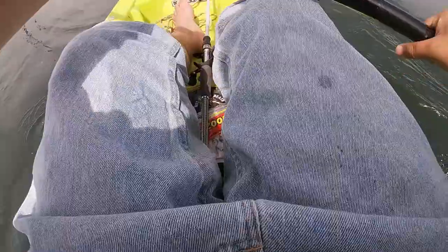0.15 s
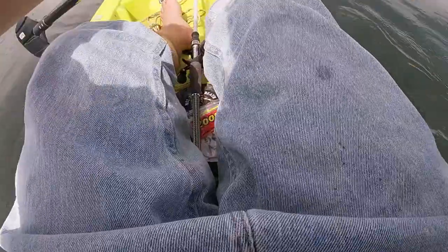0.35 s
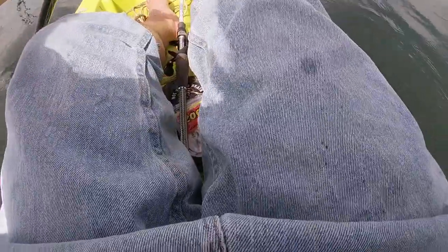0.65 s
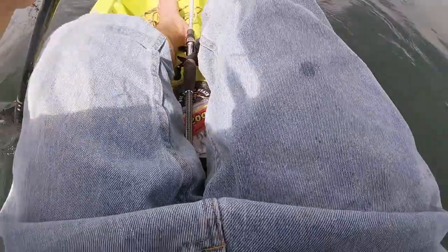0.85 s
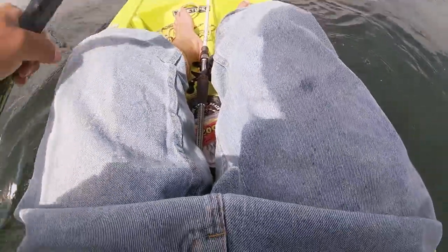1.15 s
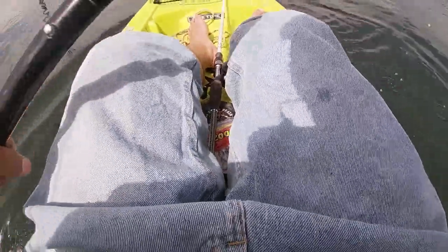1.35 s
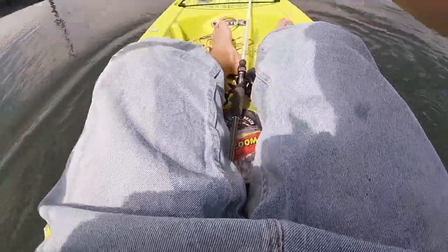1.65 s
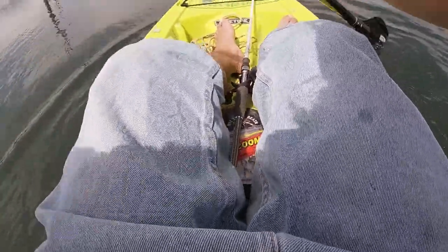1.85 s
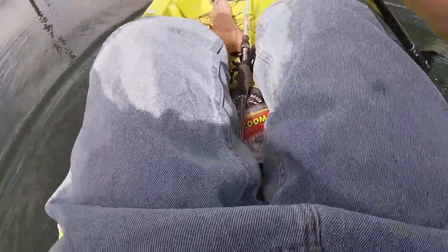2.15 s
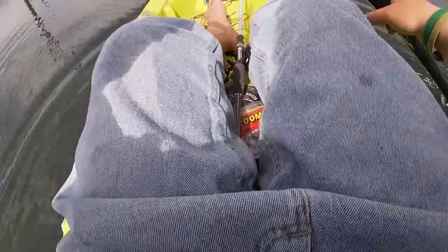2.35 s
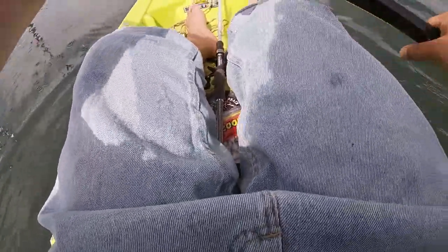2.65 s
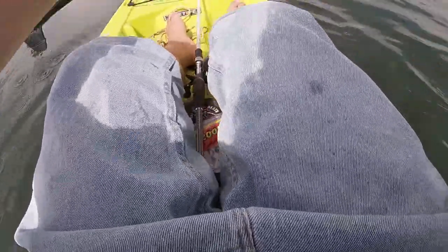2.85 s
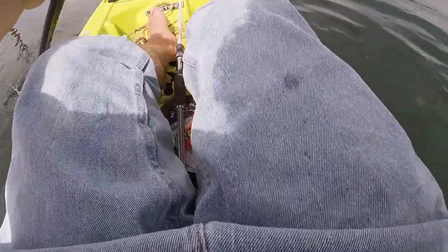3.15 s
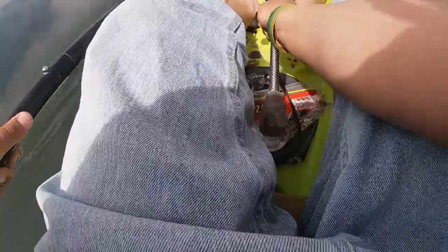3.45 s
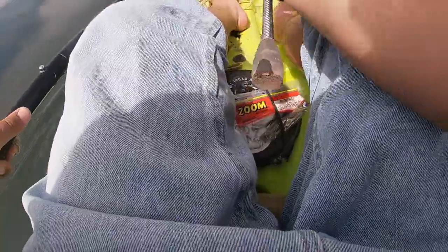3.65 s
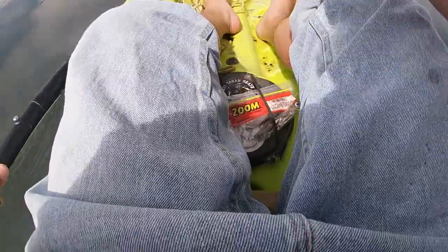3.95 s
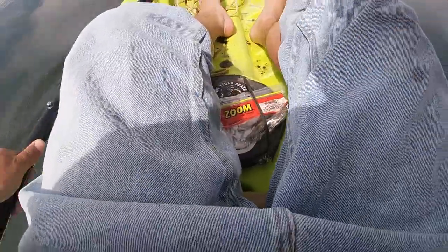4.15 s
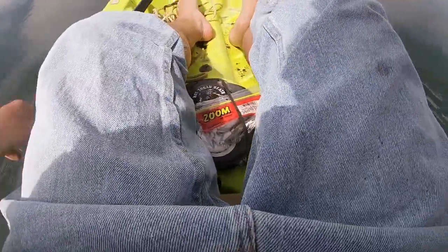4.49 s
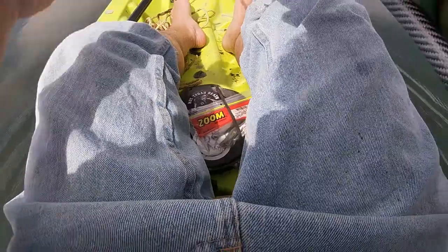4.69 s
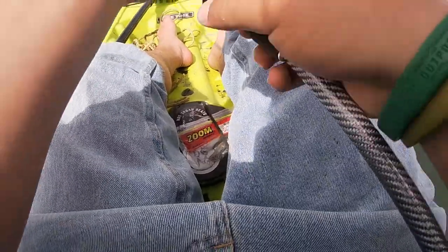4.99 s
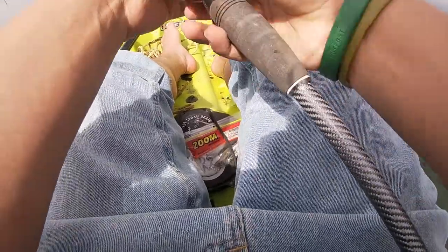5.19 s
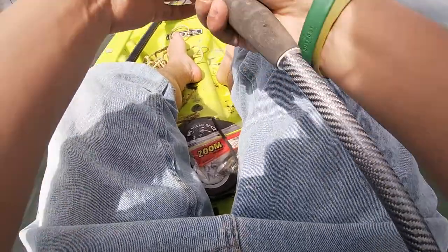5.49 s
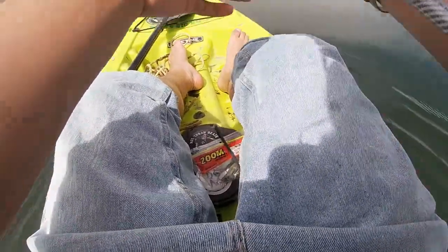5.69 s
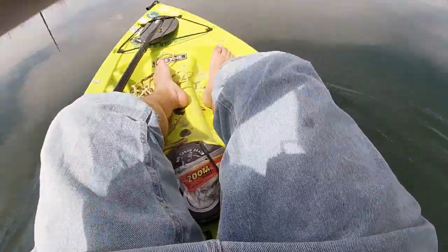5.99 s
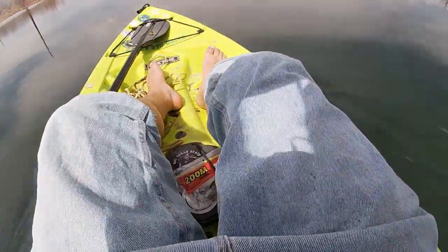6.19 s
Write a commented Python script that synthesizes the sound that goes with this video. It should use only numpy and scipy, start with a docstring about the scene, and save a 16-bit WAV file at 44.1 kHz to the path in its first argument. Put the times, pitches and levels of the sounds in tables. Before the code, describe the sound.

Low wind rumble opens alone; at about 0.13 s a bright, dense splash bursts out, full of fizz, spatter and ringing bubbles against a hollow plastic hull. It eases after 0.8 s into looser gurgles and plops, with lumpy wind thumps growing to the heaviest buffet near 1.8 s. The water thins around 2-2.5 s, bubbles singly, then surges duller and deeper from 2.65 to 3.3 s with a few hard ticks. By 3.4 s the sliding water stops and the kayak floats: soft lapping, scuffing cloth and gear, and hollow knocks, the firmest double knock at 4.0 s. Smaller taps and rubs follow. Thin high bird whistles and husky chirps appear around 4.6-5.4 s. A crisp fitting snap lands at 5.53 s, then a rapid falling-note trill runs 5.65-6.0 s over faint rustle, ending near 6.3 s with a light tick. Close outdoor microphone, muted treble.

```python
"""A plastic kayak slides off into a pond: water splashes, fizzes and gurgles along the hollow hull.
Once it floats, ripples lap, gear knocks and rubs on the hull, a fitting snaps, and small birds whistle
and trill on the shore; wind buffets the microphone. Water is made of ringing bubbles and shaped noise, solid
parts of clicks that set damped tones ringing, birds of gliding tones, chirps of noise. It sounds dull above 8 kHz."""
import sys
import numpy as np
from scipy import signal
from scipy.fft import rfft, irfft, next_fast_len
from scipy.io import wavfile

SR = 44100
rng = np.random.default_rng(int(sys.argv[2]) if len(sys.argv) > 2 else 0)


def output_pcm(signal):
    """Save a mono or channel-first signal as 16-bit PCM at the path in sys.argv[1].

    Samples are clipped to [-1, 1] before scaling.
    """
    pcm = np.clip(np.atleast_2d(signal).T, -1, 1) * 32767
    wavfile.write(sys.argv[1], SR, np.round(pcm).astype(np.int16))


N = 279133

# Splashing over time: t/s, level at 0.6-2 kHz/dB, 2.5-6 kHz against that/dB, above 6.4 kHz against it/dB
SPLASH_CURVE = [(0.0, -63.5, 13, -8), (0.126, -64.5, 15, -6.5), (0.138, -31.5, -7, -12),
                (0.23, -33.5, -9.5, -11.5), (0.3, -31.5, -11, -7), (0.325, -31, -10, -4),
                (0.37, -37, -2, -13), (0.41, -31, -11, -12), (0.5, -34, -4, -8.5), (0.6, -38.5, 6.5, -11),
                (0.68, -39, -0.5, -13.5), (0.735, -39, -3.5, -7.5), (0.76, -35, -3, -13),
                (0.8, -39.5, -1.5, -9.5), (0.88, -46, -5, -9), (0.95, -40.5, 0, -7), (1.06, -44, -11, -10),
                (1.17, -45.5, 4.5, -11.5), (1.21, -45.5, -5.5, -11), (1.32, -42, -4, -17),
                (1.38, -43.5, -1, -10.5), (1.45, -40.5, 0.5, -17.5), (1.63, -41, -5, -13.5),
                (1.78, -39.5, -12, -9.5), (1.87, -46.5, 4.5, -26), (1.93, -40.5, -19, -18),
                (1.98, -50, 1, -17), (2.08, -49, -3, -26), (2.13, -42.5, -11.5, -34),
                (2.22, -46.5, -16, -16), (2.28, -51.5, -7, -31), (2.37, -43, -19.5, -28),
                (2.42, -46, -27, -34), (2.499, -46, -15.5, -38), (2.58, -49.5, -24, -27),
                (2.62, -46.5, -13, -32), (2.66, -38.5, -23, -38), (2.69, -40.5, -8.5, -24),
                (2.74, -40, -13, -30), (2.77, -42, -7, -27), (2.8, -42.5, -5, -27), (2.84, -34.5, -13, -31),
                (2.89, -38.5, -10, -30), (2.93, -32.5, -14.5, -28), (2.99, -36, -2.5, -31),
                (3.04, -38, -6, -36), (3.09, -34, -8.5, -25), (3.13, -35.5, -9, -37),
                (3.2, -34.5, -16, -26), (3.262, -38, -19, -32), (3.36, -45.5, -7, -28),
                (3.42, -65, -3, -11)]
USUAL_BRIGHT_DB, USUAL_TOP_DB = -5, -12.5   # where the colour of the water is left as it is


def from_db(db):
    """Turn decibels into gain."""
    return 10 ** (np.asarray(db) / 20)


def rms_one(x):
    """Scale a sound to an average strength (rms) of 1."""
    return x / np.sqrt(np.mean(x ** 2) + 1e-20)


def in_time(rows):
    """Draw straight lines through a table whose first column is time; one value a sample."""
    s, *columns = np.transpose(rows)
    return [np.interp(np.arange(N) / SR, s, column) for column in columns]


def at_hz(points, hz):
    """Read a curve over frequency, with straight lines on a log-frequency axis."""
    table_hz, values = np.array(points)[:, 0], np.array(points)[:, 1]
    return np.interp(np.log(hz), np.log(table_hz), values)


def colour(x, points):
    """Shape a steady noise by a spectrum that falls steeply beyond its first and last points."""
    size = next_fast_len(N)
    hz = np.maximum(np.arange(size // 2 + 1) * SR / size, 1)
    steep = np.minimum(hz / points[0][0], 1) ** 4 * np.minimum(points[-1][0] / hz, 1) ** 4
    shaped = rfft(x, size) * from_db(at_hz(points, hz)) * steep
    return rms_one(irfft(shaped, size)[:N])


def cut(x, hz, kind, order=4):
    """Filter out what lies outside a low, high or middle band (Butterworth)."""
    return signal.sosfilt(signal.butter(order, hz, kind, fs=SR, output="sos"), x)


def drift(rate):
    """Wander slowly at random around 0 with a spread of 1; rate in Hz."""
    # smoothed noise with one value per 40 samples; the first 2000 values let the filter settle
    r = np.exp(-80 * np.pi * rate / SR)
    slow = signal.lfilter([1], [1, -2 * r, r * r], rng.standard_normal(N // 40 + 2002))[2000:]
    return np.interp(np.arange(N) / 40, np.arange(len(slow)), rms_one(slow))


def ring(clicks, hz, t60):
    """Let each click start a dying sine: a click of 1 gives height 1, falling 60 dB in t60 seconds."""
    r, w = from_db(-60 / (t60 * SR)), 2 * np.pi * hz / SR
    return signal.lfilter([0, np.sin(w)], [1, -2 * r * np.cos(w), r * r], clicks + 1e-18)


def grains(per_s, spread_db):
    """Scatter random clicks, many small and a few large."""
    sizes = from_db(spread_db * np.minimum(rng.exponential(1, N), 4.0)) * rng.choice([-1, 1], N)
    return sizes * (rng.random(N) < per_s / SR)


def add(out, s, sound):
    """Mix a short sound in at time s."""
    i = max(round(s * SR), 0)
    out[i:i + len(sound)] += sound[:N - i]


def afloat():
    """Rise from 0 to 1 as the boat comes to float freely."""
    return np.clip((np.arange(N) / SR - 3.33) / 0.055, 0, 1)


def splash():
    """A spray of tiny bubbles, each ringing at its own pitch, over hiss; both come in clumps."""
    # Colour of the water: f/Hz, relative level per Hz/dB
    water_colour = [(290, -30), (500, -4), (907, -1.5), (1020, -3), (1300, -3.5), (1440, -4.5),
                    (2350, -12.5), (2550, -11.5), (2840, -12.5), (3560, -12.5), (4800, -15.5),
                    (6860, -17.5), (8600, -33), (11200, -41), (13500, -46), (18900, -86)]
    # how far each of the two brightness columns reaches: f/Hz, share
    bright_share = [(1500, 0.06), (2800, 0.55), (5000, 0.48), (6000, 0.98), (6700, 0.73)]
    top_share = [(7000, 0.077), (9000, 0.93), (11000, 0.4), (14000, .25)]
    patchy_db = 1.4   # each band flickers on its own
    level_db, bright_db, top_db = in_time(SPLASH_CURVE)
    end = round(SPLASH_CURVE[-1][0] * SR)
    clumps = .5 * drift(22) + .7 * drift(90)
    clicks = grains(14000 * from_db(1.1 * clumps), spread_db=5.1)[:end]
    dealt = rng.integers(0, 36, end)   # deals every click to one of 36 pitches
    white, out, body_power = rng.standard_normal((2, end)), np.zeros(N), 0
    for k, hz in enumerate(np.geomspace(600, 14000, num=36)):
        fizz = rms_one(ring(clicks * (dealt == k), hz, 46.0 / hz))
        hiss = rms_one(cut(white[k % 2], [hz / 1.06, hz * 1.06], "band", order=1))
        mixed = cut(0.64 * fizz + 0.75 * hiss, [hz / 1.265, hz * 1.23], "band", order=2)
        # higher bands are wider, so they carry more of a level given per Hz
        band = from_db(at_hz(water_colour, hz)) * np.sqrt(hz / 1000) * mixed
        body_power += np.mean(band ** 2) * (hz < 2000)
        bright_tilt_db = at_hz(bright_share, hz) * (bright_db - USUAL_BRIGHT_DB)
        top_tilt_db = at_hz(top_share, hz) * (top_db - USUAL_TOP_DB)
        flicker_db = 1.47 * clumps + patchy_db * drift(9.3)
        out[:end] += from_db(bright_tilt_db + top_tilt_db + flicker_db)[:end] * band
    return from_db(level_db) * out / np.sqrt(body_power)


def bubble(db, hz):
    """A shrinking air pocket: a brief pop as it pinches off, then a soft birth and a damped, rising ring."""
    birth_turns, ring_turns = 0.56, 27   # cycles of build-up, cycles to fall 60 dB at 400 Hz
    small_rings = 0.31   # small bubbles ring for more turns: power of the pitch
    pop_db, pop_pitch, pop_turns = -12, 2.17, 5.4   # against the ring; turns of the ring's pitch to fall 60 dB
    bend = 2.17   # the pitch rises by twice this share of hz each second
    t60 = ring_turns * (hz / 400) ** small_rings / hz
    t = np.arange(round(.2 * SR)) / SR
    shape = (1 - np.exp(-t * hz / birth_turns)) * from_db(-60 * t / t60)
    ringing = shape / shape.max() * np.sin(2 * np.pi * hz * (0.954 * t + bend * t ** 2))
    pop = from_db(pop_db - 60 * t * hz / pop_turns) * np.sin(2 * np.pi * pop_pitch * hz * t)
    return from_db(db) * (pop + ringing)


def single_bubbles():
    """Loud bubbles ring at their set moments, smaller drops at random while the water splashes."""
    # Bubbles and drops heard one by one: t/s, ring level/dB, f/Hz
    loud_bubbles = [(0.135, -30, 1050), (0.152, -19, 318), (0.167, -21.5, 1034), (0.223, -17, 220),
                    (0.178, -25, 1030), (0.226, -21.5, 810), (0.231, -17.5, 1084), (0.235, -24.5, 520),
                    (0.29, -25, 2140), (0.424, -31, 1460), (0.292, -24.5, 765), (0.365, -26, 1160),
                    (0.391, -24.5, 275), (0.403, -28.5, 780), (0.445, -33, 1450), (0.482, -29, 1070),
                    (0.609, -25.5, 840), (0.846, -31.5, 875), (0.912, -34, 1580), (1.05, -30.5, 925),
                    (1.084, -33.5, 700), (1.1, -25.5, 451), (1.119, -45, 920), (1.15, -29, 318),
                    (1.199, -24, 479), (1.2, -26.5, 344), (1.28, -33.5, 302), (1.434, -27, 512),
                    (1.494, -20, 340), (1.228, -34, 1750), (1.24, -21, 428), (1.347, -33.5, 1010),
                    (1.384, -25, 547), (1.432, -27, 323), (1.496, -26, 145), (1.529, -25, 350),
                    (1.611, -31, 145), (1.611, -31, 615), (1.651, -31.5, 236), (1.633, -30, 936),
                    (1.65, -34, 505), (1.927, -34, 1080), (2.107, -36.5, 980), (2.145, -37, 875),
                    (2.292, -30, 197), (2.299, -39.5, 1660), (2.341, -40, 1740), (2.35, -34, 503),
                    (2.36, -44, 1600), (2.39, -46, 1600), (2.426, -43, 1640), (2.46, -53, 1550),
                    (2.49, -50, 1600), (2.52, -45, 1590), (2.207, -38, 1640), (2.404, -27, 480),
                    (2.416, -34, 765), (2.479, -18, 404.4), (2.567, -34.5, 1730), (2.574, -29, 210),
                    (2.609, -32.5, 1080), (2.637, -26, 479), (2.639, -31, 827), (2.648, -28.5, 1730),
                    (2.673, -32, 1520), (2.9, -30, 1470), (2.971, -33, 1580), (2.699, -25.5, 355),
                    (2.719, -23, 328), (2.75, -20.5, 374), (2.717, -35, 1450), (2.721, -39, 2450),
                    (2.778, -31, 920), (2.781, -32.5, 1600), (2.821, -30, 1450), (2.832, -31, 1100),
                    (2.797, -24.5, 278), (2.821, -35, 990), (2.821, -21.5, 350), (2.868, -22.5, 410),
                    (2.874, -28, 865), (2.907, -29, 183), (2.964, -22, 174), (3.027, -25.5, 178),
                    (3.057, -18, 167.5), (3.058, -34, 910), (3.085, -29, 860), (3.318, -32, 217)]
    drops_per_s, drop_db, drop_spread_db = 12, 3, 8   # level against the splash, and how far below that it may lie
    out, splash_db = np.zeros(N), in_time(SPLASH_CURVE)[0]
    first_s, last_s = SPLASH_CURVE[0][0], SPLASH_CURVE[-1][0]
    luck = rng.random((40, 3))[:round(drops_per_s * (last_s - first_s))]
    drops = [(s, splash_db[round(s * SR)] + drop_db - drop_spread_db * size, 700 * 4.0 ** pitch)
             for s, size, pitch in luck * [last_s, 1, 1]]
    for s, db, hz in loud_bubbles + drops:
        add(out, s, bubble(db, hz))
    return out


def gurgle():
    """Bubbles of many sizes ring a few cycles against the hull."""
    # Gurgle under the sliding hull: t/s, level/dB
    bubbling = [(0.0, -76), (0.12, -48), (0.14, -31.5), (0.27, -30.5), (0.32, -36), (0.48, -37),
                (0.85, -47.5), (1.11, -41), (1.28, -44), (1.36, -44.5), (1.44, -33), (1.56, -33),
                (1.63, -31.5), (1.69, -36.5), (1.73, -26.5), (1.79, -39), (1.83, -36.5), (1.88, -38.5),
                (1.94, -49), (2.16, -46.5), (2.64, -35), (2.81, -36), (2.98, -29.5), (3.42, -42)]
    # Strength of the bubbles by pitch: f/Hz, relative level/dB
    gurgle_colour = [(53, -56), (90, -26), (102, -13), (131, -13), (172, -4), (214, -7.5), (408, 1),
                     (630, -2), (900, -45), (1170, -47), (1980, -120)]
    clicks = grains(1400 * from_db(2.5 * drift(8)), spread_db=4.0)
    dealt = rng.integers(0, 18, N)   # deals every click to one of 18 pitches
    mixed = np.zeros(N)
    for k, hz in enumerate(np.geomspace(120, 800, num=18)):
        mixed += from_db(at_hz(gurgle_colour, hz)) * ring(clicks * (dealt == k), hz, 40.0 / hz)
    return from_db(in_time(bubbling)[0]) * rms_one(cut(mixed, [110, 900], "band", order=2))


def ticks():
    """Each tick is a noise burst of a few milliseconds through a broad resonance, with a bright edge."""
    # Spatter and small hard parts: t/s, peak level/dB, f/Hz
    tick_list = [(0.1334, -27.5, 2040), (0.153, -22, 2030), (0.156, -22, 5060), (0.26, -30, 7000),
                 (0.32, -24, 6000), (0.324, -27.5, 6800), (0.333, -28, 5500), (0.401, -39, 2200),
                 (0.403, -24.5, 6460), (0.422, -44, 6500), (0.436, -30, 6800), (0.48, -34, 7500),
                 (0.489, -28, 7000), (0.547, -26.5, 6100), (0.565, -27.5, 3950), (0.652, -32, 8000),
                 (0.735, -38, 6500), (0.753, -26, 2600), (0.757, -23, 3870), (0.762, -23.5, 1800),
                 (0.8552, -22.5, 7040), (0.914, -25.5, 3180), (0.953, -30, 6900), (0.964, -38, 6000),
                 (1.01, -36, 4800), (1.035, -34, 4500), (1.1408, -32.5, 2950), (1.171, -30, 6400),
                 (1.388, -31, 6600), (1.631, -32, 7060), (1.2575, -33, 2040), (1.433, -28, 2340),
                 (1.4882, -28, 4350), (1.5085, -32, 2260), (1.716, -30, 5640), (1.8508, -49, 3340),
                 (1.8767, -34.5, 2540), (1.921, -51, 7000), (1.959, -43, 7000), (1.998, -37, 4450),
                 (1.997, -36, 7500), (2.566, -44.5, 7500), (2.0294, -40, 3070), (2.0509, -49, 2730),
                 (2.072, -41, 5000), (2.103, -34, 2080), (2.119, -34.5, 2900), (2.158, -50, 6000),
                 (2.216, -38, 4500), (2.2795, -38, 2900), (2.338, -39, 2940), (2.36, -37.5, 3300),
                 (2.432, -43, 5400), (2.6105, -38.5, 4330), (2.566, -45, 5000), (2.619, -32.5, 2980),
                 (2.685, -37, 3370), (2.718, -37, 2530), (2.7, -44, 5500), (2.716, -36, 5440),
                 (2.76, -33, 3800), (2.838, -34, 3500), (2.8744, -19, 1660), (2.8745, -21.5, 4240),
                 (2.897, -38, 3600), (2.971, -27, 3040), (3.0648, -19.5, 5560), (2.988, -36, 4800),
                 (3.078, -25.5, 3500), (3.087, -30, 3940), (3.171, -37, 6000), (3.249, -34.5, 5200),
                 (3.286, -36, 4800), (3.117, -42, 9500), (3.132, -48, 9500), (3.12, -27.5, 2900),
                 (3.171, -33, 8900), (3.247, -43, 7000), (3.2392, -27, 2800), (3.293, -41, 3300),
                 (3.366, -49, 9000), (3.5023, -29, 1790), (3.677, -42, 6900), (3.718, -45, 5960),
                 (3.753, -55, 3600), (3.765, -43, 5000), (3.858, -37, 7350), (3.863, -39, 7300),
                 (3.884, -44, 2650), (3.886, -43, 7080), (3.918, -47, 7200), (3.933, -45, 7300),
                 (3.9727, -16.5, 2480), (3.973, -23, 6240), (4.002, -22, 2480), (4.001, -26, 6300),
                 (4.199, -26, 2440), (4.406, -39, 2400), (4.491, -46, 2770), (4.5627, -45, 2180),
                 (4.582, -43.5, 2220), (4.66, -52, 2500), (4.684, -52, 1500), (4.699, -40, 3870),
                 (4.888, -45.5, 1310), (4.905, -41, 1800), (5.219, -38, 2300), (5.227, -29, 2300),
                 (5.296, -44, 1900), (5.221, -48, 4600), (5.229, -41, 8600), (5.332, -38.5, 3170),
                 (5.333, -38, 5800), (5.4942, -34.5, 2740), (6.035, -48, 6100), (6.292, -34.5, 2480)]
    t60_s, edge_db = 0.013, -23.5   # length, level of the bright edge against the body
    out, t = np.zeros(N), np.arange(round(.05 * SR)) / SR
    for s, db, hz in tick_list:
        sharp = rng.standard_normal(len(t)) * (1 - np.exp(-t / 0.00016)) * from_db(-60 * t / t60_s)
        body = rms_one(cut(sharp, np.clip([hz / 1.68, hz * 1.105], 100, 9000), "band", order=2))
        edge = from_db(edge_db) * rms_one(cut(sharp, 9500, "high", order=2))
        burst = body + edge + from_db(-20.0) * rms_one(sharp)
        # the microphone housing dims the top
        burst = cut(burst, 10200, "low", order=6) + from_db(-24.0) * burst
        add(out, s, from_db(db) * burst / np.abs(burst).max())
    return out


def through_port(x):
    """The band that the microphone port passes rises and dims with the top of the splash, with sharp edges."""
    low_hz, high_hz, edge_hz = 6300, 8200, 330
    size = next_fast_len(N)
    hz = np.arange(size // 2 + 1) * SR / size
    inside = (np.tanh((hz - low_hz) / edge_hz) - np.tanh((hz - high_hz) / edge_hz)) / 2
    band = irfft(rfft(x, size) * inside, size)[:N]
    top_db = in_time(SPLASH_CURVE)[2]
    return x + (from_db(top_db - USUAL_TOP_DB) - 1) * band


def lapping():
    """Ripples at the floating hull: soft, low, fluttering noise heard through the hull."""
    # Ripples over time: t/s, level/dB
    lap_curve = [(3.3, -45), (3.36, -35.5), (3.41, -59), (3.47, -34), (3.6, -49), (3.72, -42.5),
                 (3.95, -46), (4.05, -31.5), (4.14, -45.5), (4.23, -41), (4.36, -43), (4.47, -42),
                 (4.66, -43.5), (5.0, -48), (5.6, -47.5), (5.9, -49), (6.33, -47.5)]
    # Their colour: f/Hz, relative level per Hz/dB
    lap_colour = [(53, -34), (90, -14.5), (135, 4.5), (194, -0.5), (270, -2.5), (365, -7.5), (623, -23.5),
                  (818, -25), (1000, -38), (1300, -36), (2200, -120)]
    flutter_db = 0.36 * drift(15.0) + 2.04 * drift(28.6)
    noise = colour(rng.standard_normal(N), lap_colour)
    return afloat() * from_db(in_time(lap_curve)[0] + flutter_db) * noise


def knocks():
    """Each blow rings the hull: its spot favours one low tone, a hard blow wakes the upper tones."""
    # Blows on the hull: t/s, strength/dB, hardness (treble against strength)/dB, favoured f/Hz
    blows = [(1.809, -15, -15, 465), (3.468, -26, -35, 300), (3.501, -25.5, -30, 306),
             (3.642, -35, -36, 238), (3.858, -34.5, 20.5, 318), (3.9719, -22, 10, 340),
             (4.0009, -15.5, 12, 292), (4.011, -18.5, -7, 246), (4.018, -32, 18, 235), (4.361, -28, 5, 318),
             (4.411, -31, -18, 172), (4.494, -22, -10, 198), (4.504, -25.5, -19, 169),
             (4.564, -26, -0.5, 306), (4.579, -40, -27, 162), (4.688, -25.5, -19, 145),
             (4.908, -31, 5, 170), (5.229, -37, 8, 143), (5.495, -42, 11, 686), (6.291, -43, -10, 143)]
    # Tones of the hull: f/Hz, relative level/dB, time to fall 60 dB/s
    hull_tones = [(145, -27, 0.02), (210, -5, 0.16), (249.7, -1, 0.097), (318, 3, 0.089), (410, -1, 0.061),
                  (483, -5, 0.098), (686, 6.5, 0.029), (980, -2.5, 0.038), (1470, 8, 0.019),
                  (2270, -34, 0.019), (2480, -21, 0.011), (2900, -2, 0.027), (3300, -14, 0.022)]
    s, strength_db, hard_db, spot_hz = np.transpose(blows)
    at, out = np.round(s * SR).astype(int), np.zeros(N)
    luck_db = rng.normal(0, 1.5, (len(at), len(hull_tones)))
    for k, (hz, db, t60) in enumerate(hull_tones):
        upper = at_hz([(700, 0.0032), (1300, 0.8)], hz)   # how much this tone follows hardness
        off_spot_db = -7 * np.abs(np.log2(hz / spot_hz))
        push_db = strength_db + db + luck_db[:, k] + upper * hard_db + (2.0 - upper) * off_spot_db
        clicks = np.zeros(N)
        clicks[at] = (-1) ** k * from_db(push_db)
        # low tones get a softer push
        out += ring(cut(clicks, 1.55 * hz, "low", order=2), hz, t60)
    return out


def strokes():
    """Gain of the dull, middle and bright part of the rubbing: each stroke swells and fades."""
    # Rubbing strokes: strongest at t/s, swell/s, fade/s, level at 0.8-1.9 kHz/dB, at 1.9-3.3 kHz/dB,
    # at 4.7-8.5 kHz/dB
    stroke_list = [(3.36, 0.08, 0.014, -37.5, -51, -50), (3.437, 0.014, 0.074, -48, -54, -75),
                   (3.686, 0.06, 0.041, -53, -56.5, -55), (3.72, 0.016, 0.012, -47, -56, -52.5),
                   (3.768, 0.05, 0.014, -49, -59, -56.5), (3.824, 0.025, 0.049, -60, -62, -59),
                   (3.925, 0.11, 0.018, -55, -55, -58), (4.01, 0.034, 0.065, -37.5, -49, -54.5),
                   (4.05, 0.026, 0.021, -51, -59, -58), (4.211, 0.14, 0.093, -41.5, -45.5, -51),
                   (4.26, 0.13, 0.041, -44, -43, -54), (4.33, 0.25, 0.12, -53.5, -49, -48),
                   (4.415, 0.042, 0.031, -53.5, -53, -58), (4.685, 0.021, 0.039, -58, -57.5, -58),
                   (4.911, 0.018, 0.068, -45.5, -65, -66), (4.96, 0.033, 0.13, -60, -67, -65),
                   (5.106, 0.042, 0.027, -67, -63, -55), (5.23, 0.11, 0.1, -86, -57, -52.5),
                   (5.232, 0.044, 0.02, -51, -50, -61), (5.4, 0.69, 0.36, -82, -64, -56.5),
                   (5.497, .004, .014, -53, -52, -56), (5.518, .03, .012, -62, -52, -52),
                   (5.529, .004, .02, -47, -45, -49), (5.65, 0.13, 0.22, -83, -62, -58.5),
                   (5.79, 0.066, 0.078, -81, -58.5, -61), (6.0, 0.018, 0.064, -72, -78, -64.5),
                   (6.1, 0.18, 0.17, -64, -69.5, -67.5), (6.295, 0.059, 0.25, -56, -76, -48.5)]
    roundness = 2.95   # swell and fade follow a sine raised to this power
    resting_db = [-75.5, -88, -70.5]   # faint rustle between strokes
    t, power = np.arange(N) / SR, np.outer(from_db(resting_db) ** 2, np.ones(N))
    for s, swell_s, fade_s, *levels_db in stroke_list:
        i, j = round((s - swell_s) * SR), round((s + fade_s) * SR)
        place = np.interp(t[i:j], [s - swell_s, s, s + fade_s], [0, 1, 0])
        gain = np.outer(from_db(levels_db), np.sin(np.pi / 2 * place) ** roundness)
        power[:, i:j] += gain ** 2
    return np.sqrt(power)


def rub():
    """Cloth and gear on the hull: dense fine slips take on its colour; the microphone port rings at the top."""
    # Colour of the rubbed hull: f/Hz, relative level per Hz/dB
    rub_colour = [(350, 10), (600, 3.5), (1050, -3), (1170, 2), (1430, 1.5), (1560, -1), (1730, -4),
                  (1930, -14), (2090, -9.5), (2500, -8.5), (3530, -19), (4000, -21), (4650, -21),
                  (5300, -22), (6090, -25), (7120, -23.5), (8600, -35.5), (11200, -43), (18900, -120)]
    port_hz, port_width_hz, port_db = 7140, 480, -2.5   # resonance of the microphone port
    slips = rng.standard_normal(N) + 0.4 * rms_one(grains(1300, spread_db=6.0))
    body = colour(slips, rub_colour) * from_db(1.33 * drift(40))
    port = cut(body, [port_hz - port_width_hz / 2, port_hz + port_width_hz / 2], "band", order=1)
    dull = cut(body, 1750, "low")
    middle = cut(body, [1900, 3900], "band", order=3)
    bright = cut(body + from_db(port_db) * port, 4500, "high")
    return afloat() * sum(gain * rms_one(part) for gain, part in zip(strokes(), (dull, middle, bright)))


def snap():
    """A fitting snaps home: a cluster of quick contacts rings its short, stiff tones."""
    # Contacts: t/s, strength/dB
    contacts = [(5.5245, -27), (5.5251, -27), (5.5257, -14), (5.5265, -13), (5.5273, -19), (5.5282, -28),
                (5.5302, -38), (5.533, -47)]
    # Tones of the fitting: f/Hz, relative level/dB, time to fall 60 dB/s
    fitting_tones = [(564, -18, 0.011), (1450, -6, 0.021), (2040, -39.5, 0.023), (2600, -24, 0.0071),
                     (3500, 2.5, 0.008), (4400, 4.5, 0.0017), (5040, 6, 0.013), (6460, 12, 0.0021),
                     (7550, 10, 0.0045), (10400, -17, 0.0072)]
    s, strength_db = np.transpose(contacts)
    clicks, rings = np.zeros(N), np.zeros(N)
    clicks[np.round(s * SR).astype(int)] = from_db(strength_db) * (-1) ** np.arange(len(s))
    for k, (hz, db, t60) in enumerate(fitting_tones):
        rings += (-1) ** k * from_db(db) * ring(clicks, hz, t60)
    return cut(rings, 10000, "low", order=2) + from_db(-10) * cut(rings, [8300, 12500], "band", order=2)


def whistles():
    """Whistles and faint low tones: sines whose pitch and level glide from point to point."""
    # Whistles, one list of points each: t/s, f/Hz, level (rms)/dB
    whistle_notes = [
        [(4.6, 4270, -95), (4.622, 4350, -61), (4.66, 4295, -55), (4.716, 4262, -53), (4.78, 4340, -64),
         (4.798, 4350, -81), (4.918, 4260, -68), (4.94, 4200, -89)],
        [(4.95, 4215, -59), (4.968, 4325, -48), (4.984, 4240, -40), (5.02, 4170, -43), (5.116, 4295, -49.5),
         (5.14, 4380, -65), (5.155, 4260, -68), (5.175, 4260, -80)],
    ]
    # High whistles: t/s, f/Hz, level (rms)/dB
    high_notes = [
        [(4.903, 5550, -62), (4.908, 6450, -58), (4.918, 6680, -61), (4.942, 6800, -59), (4.948, 6850, -80)],
        [(5.235, 7050, -66), (5.27, 7030, -67), (5.31, 7050, -65), (5.345, 7000, -71), (5.375, 6750, -62),
         (5.4, 6350, -58), (5.415, 5800, -54), (5.426, 5200, -64), (5.436, 4700, -60), (5.445, 4400, -80)],
    ]
    # Faint low tones far off: t/s, f/Hz, level (rms)/dB
    low_notes = [
        [(4.71, 880, -62), (4.75, 860.0, -71), (4.824, 919.5, -69), (4.882, 905, -67), (4.9, 823, -46)],
        [(6.24, 830, -67.5), (6.25, 840, -72), (6.314, 853, -56), (6.33, 880, -64)],
    ]
    out = np.zeros(N)
    for rows in whistle_notes + high_notes + low_notes:
        s, hz, db = np.transpose(rows)
        t = np.arange(s[0], s[-1], 1 / SR)
        turns = np.cumsum(np.interp(t, s, hz)) / SR
        add(out, s[0], np.sqrt(2) * from_db(np.interp(t, s, db)) * np.sin(2 * np.pi * turns))
    return out


def trill():
    """One short falling note repeats, at times thinned in its middle where an echo cancels it."""
    # Notes of the trill: t/s, level/dB, depth of the dip (0-1)
    trill_notes = [(5.638, -52, 0), (5.662, -48.5, 0), (5.687, -48, 0), (5.71, -49.5, 0), (5.735, -48.5, 0),
                   (5.76, -49.5, .1), (5.785, -52, .3), (5.811, -50.5, .3), (5.838, -52, .8),
                   (5.865, -52, .8), (5.892, -50.5, .6), (5.918, -49, 0), (5.943, -52.5, .1),
                   (5.968, -58.5, .3), (5.991, -65, .3)]
    start_hz, fall, note_s = 3990, .81, .025   # fall: end pitch against start pitch
    out, count = np.zeros(N), round(note_s * SR)
    falling_hz, swell = np.geomspace(start_hz, fall * start_hz, count), np.hanning(count)
    for s, db, dip in trill_notes:
        turns = np.cumsum(falling_hz * rng.normal(1, .006)) / SR
        shape = swell ** .95 * (1 - dip * swell ** 8)
        add(out, s, from_db(db) * shape * np.sin(2 * np.pi * turns))
    return out


def chirps():
    """Husky chirps: each is a narrow band of noise that swells and fades."""
    # Chirps: t/s, length/s, f/Hz, level/dB
    chirp_list = [(4.944, 0.029, 5150, -59), (4.948, .028, 5930, -60), (5.07, .065, 5500, -54),
                  (5.339, .035, 3970, -51.5), (5.35, 0.044, 4730, -57)]
    width_hz, out = 350, np.zeros(N)
    for s, length_s, hz, db in chirp_list:
        count = round(length_s * SR)
        breathy = cut(rng.standard_normal(SR // 10), [hz - width_hz / 2, hz + width_hz / 2], "band", order=2)
        add(out, s, from_db(db) * rms_one(breathy)[-count:] * np.hanning(count))
    return out


def birds():
    """All bird voices, with one faint echo off the bank."""
    out = whistles() + trill() + chirps()
    lag = round(0.0074 * SR)
    out[lag:] += from_db(-14) * out[:-lag]
    return out


def wind():
    """Lumpy pressure on the microphone's membrane, with single swings at the strongest gusts."""
    # Wind rumble over time: t/s, level/dB
    gust_curve = [(0.0, -25.5), (0.12, -30.5), (0.49, -42), (0.65, -27), (0.79, -23), (0.88, -30),
                  (1.23, -35), (1.39, -33), (1.67, -23.5), (1.8, -19.5), (1.92, -35.5), (2.27, -32),
                  (2.61, -44.5), (2.79, -52), (3.01, -50), (3.24, -42.5), (4.25, -43), (4.49, -40),
                  (4.85, -44), (5.75, -42.5), (5.87, -40), (6.33, -46)]
    # Its colour: f/Hz, relative level per Hz/dB
    wind_colour = [(7.1, -50), (12, -1), (38, 0.5), (61, -1.5), (126, -7.5), (204, -18), (258, -23.5),
                   (400, -36), (520, -35.5), (880, -120)]
    # Gusts that thump the membrane: t/s, peak level/dB, f/Hz
    buffets = [(0.0, -19, 46.6), (0.056, -23, 42.7), (0.106, -12.5, 45.3), (0.14, -16, 100),
               (0.632, -25, 58.5), (0.699, -29, 45.6), (0.764, -19, 39.6), (0.864, -17.5, 39.4),
               (1.254, -21, 45.4), (1.485, -15, 53.3), (1.575, -8.5, 49.3), (1.701, -13.5, 55),
               (1.73, -12, 54), (1.76, -15, 94), (1.811, -4.5, 140), (1.8171, -10.5, 92),
               (1.822, -23, 45.7), (1.88, -26, 50.4), (1.916, -19.5, 44.6), (1.95, -22.5, 44.5),
               (2.123, -24.5, 38.6), (3.131, -25, 50.5), (3.336, -27, 52), (4.308, -25.5, 42),
               (4.485, -22.5, 59), (5.212, -30, 50), (5.69, -19.5, 42.7), (5.716, -28, 40.3),
               (5.929, -28.5, 45), (6.007, -29, 57.5), (6.058, -29.5, 56)]
    lumps_db, lumps_hz = 2.5, 12   # spread and rate of the wandering level
    level_db = in_time(gust_curve)[0] + lumps_db * drift(lumps_hz)
    out = from_db(level_db) * colour(rng.standard_normal(N), wind_colour)
    for s, db, hz in buffets:
        turns = np.arange(round(1.5 * SR / hz)) * hz / SR
        add(out, s, from_db(db) * np.sin(2 * np.pi * turns) * np.hanning(len(turns)))
    return out


def pond_hiss():
    """Faint hiss of the open pond: shaped noise with a changing level."""
    # Colour of the hiss: f/Hz, relative level per Hz/dB
    hiss_colour = [(500, 3), (800, -14), (1350, -7.5), (1900, -15.5), (3000, -11.5), (5000, -16.5),
                   (7200, -17.5), (8400, -30.5), (11000, -38), (13000, -46), (15000, -56.5)]
    # Hiss over time: t/s, level/dB
    hiss_curve = [(0, -76), (1.9, -83), (2.05, -72), (3.3, -69), (3.36, -56.5), (3.6, -56), (3.92, -59.5),
                  (3.95, -61), (4.0, -51), (4.06, -62), (4.09, -61), (4.16, -55), (4.4, -64.5),
                  (4.45, -66.5), (5.0, -66), (5.14, -72), (5.2, -69), (5.5, -63), (5.56, -66), (5.62, -65),
                  (5.9, -69.5), (6.33, -58)]
    return from_db(in_time(hiss_curve)[0]) * colour(rng.standard_normal(N), hiss_colour)


def scene():
    """Everything reaches one microphone; the sliding water stops as the boat floats."""
    sliding = (1 - afloat()) * (splash() + single_bubbles() + gurgle())
    wet = through_port(sliding + lapping() + ticks())
    gear = knocks() + rub() + snap()
    return (wet + gear + birds() + wind() + pond_hiss())[None]


def record(dry):
    """Round the highest peaks and cut the top."""
    rounded = dry / (1 + np.abs(dry / .85) ** 4) ** .25
    return signal.sosfilt(signal.cheby2(12, 70, 16200, fs=SR, output="sos"), rounded)   # 70 dB down from 16.2 kHz


dry = scene()
out = record(dry)
output_pcm(out)
```